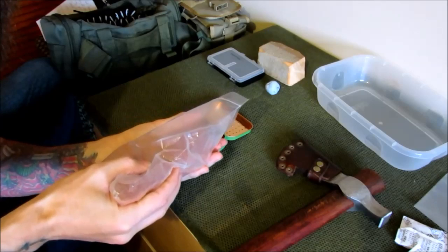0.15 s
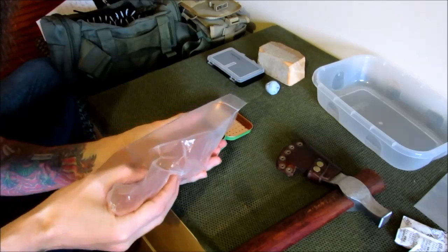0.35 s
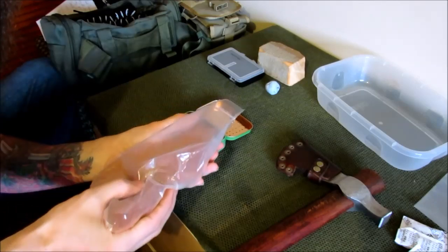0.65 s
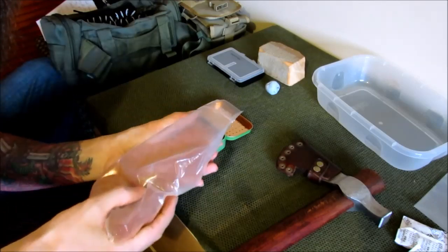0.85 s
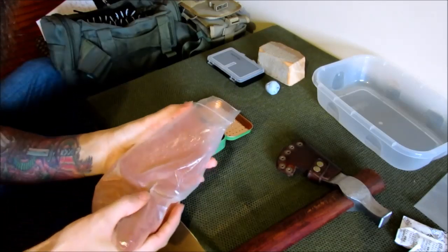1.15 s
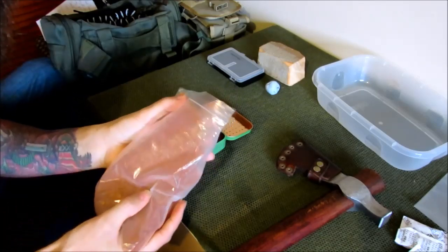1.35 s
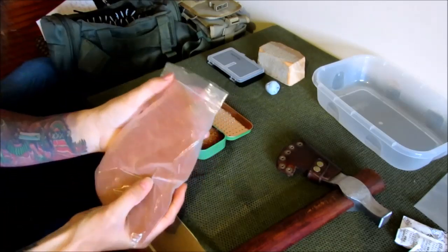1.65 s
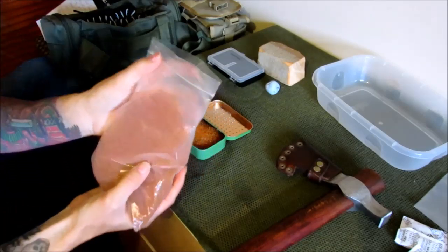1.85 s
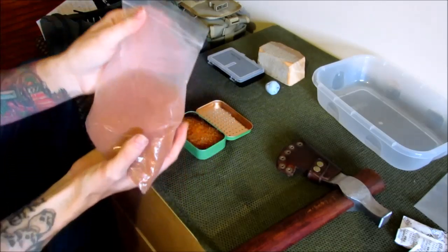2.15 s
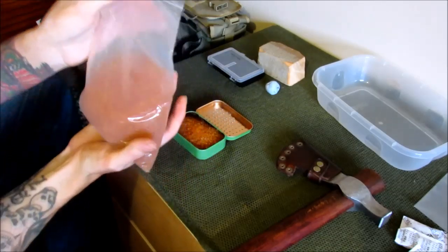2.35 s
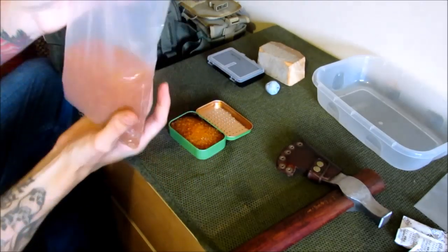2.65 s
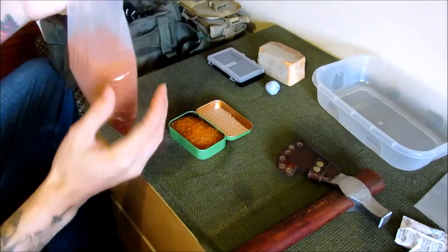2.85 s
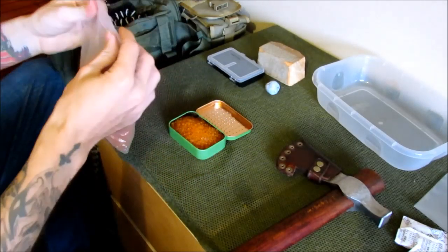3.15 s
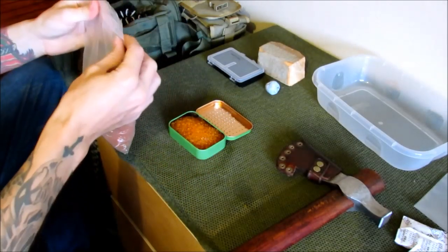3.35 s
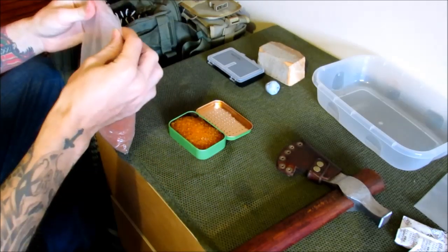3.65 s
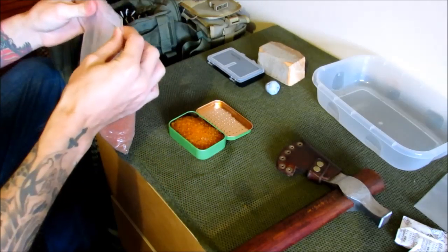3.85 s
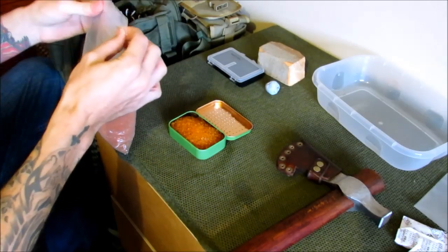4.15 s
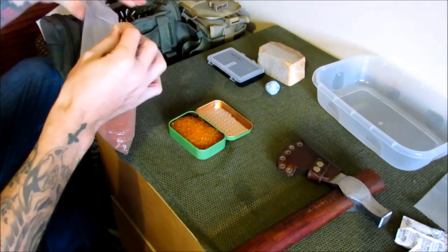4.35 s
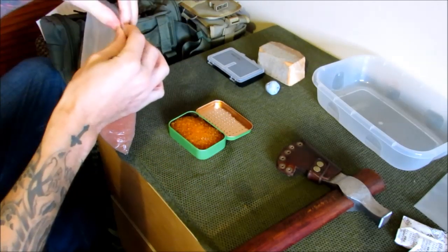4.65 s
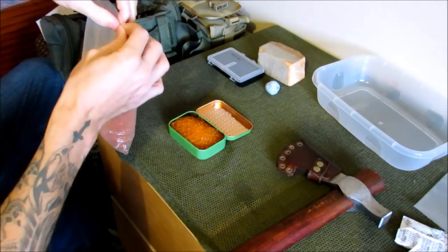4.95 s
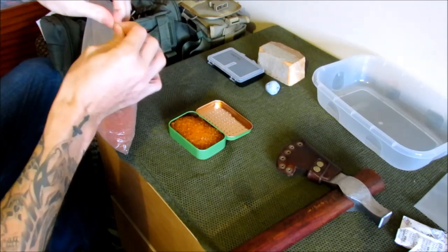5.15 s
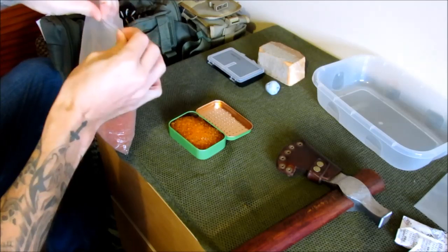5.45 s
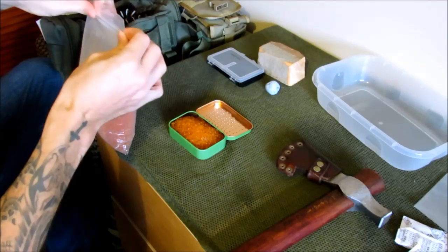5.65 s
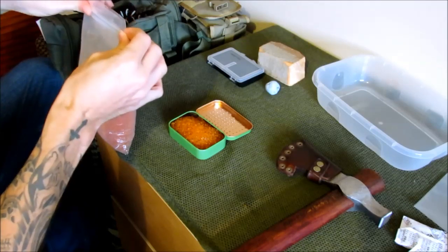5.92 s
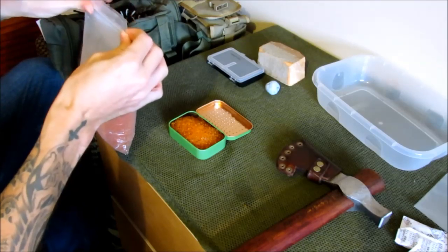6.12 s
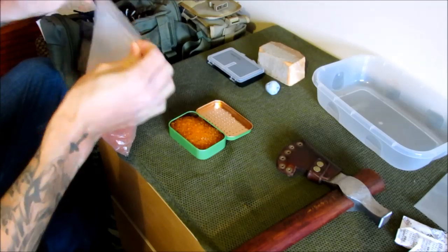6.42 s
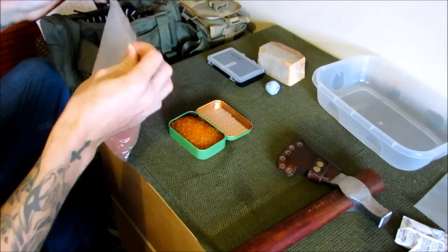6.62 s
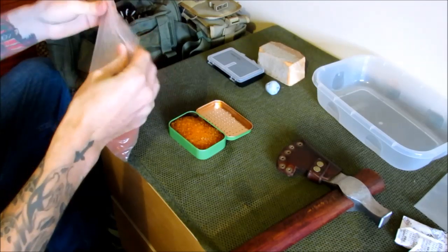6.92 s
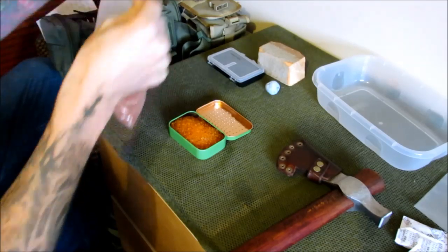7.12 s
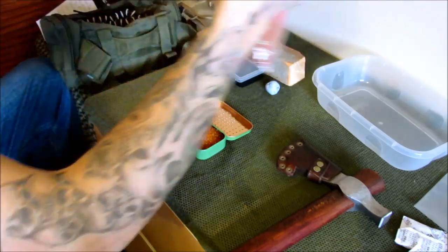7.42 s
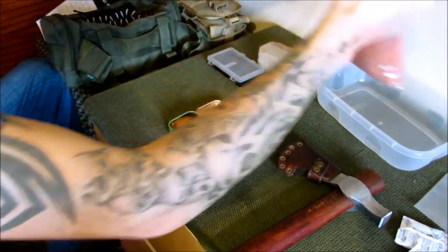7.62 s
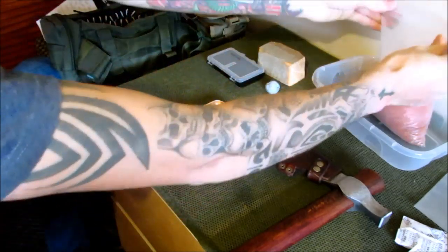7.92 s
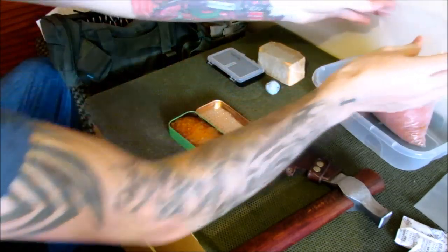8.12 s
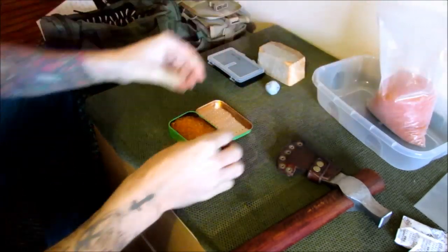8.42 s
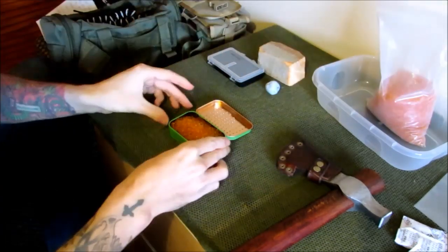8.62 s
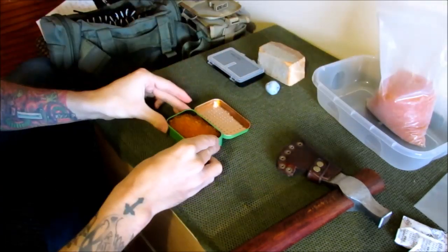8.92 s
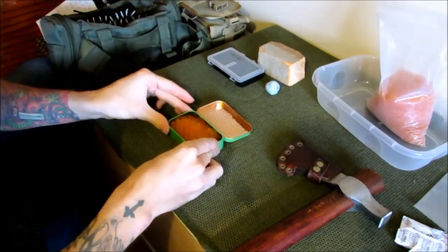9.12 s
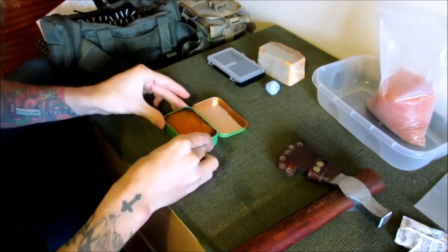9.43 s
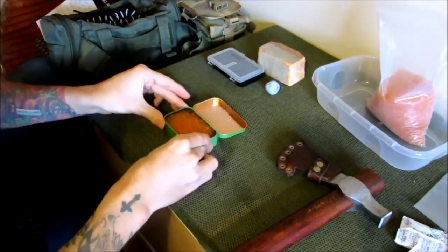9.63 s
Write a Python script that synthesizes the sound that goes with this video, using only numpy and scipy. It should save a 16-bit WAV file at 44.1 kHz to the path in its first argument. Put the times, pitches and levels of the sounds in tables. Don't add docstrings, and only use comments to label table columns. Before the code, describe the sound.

Close, dry stereo sound at a table indoors. Tiny hard beads hiss and rattle as they slide in a thin plastic bag, with sudden creases popping. Handling becomes uneven crinkles and faint pinching, then stronger snaps. After a short lull the bag is dropped in a tub with a hard crunchy hit. Finally light bright clicks of beads in a tin gather, with faint fingertip thumps.

```python
import sys
import numpy as np
from scipy import signal
from scipy.fft import rfft, irfft, next_fast_len
from scipy.io import wavfile
from scipy.ndimage import uniform_filter1d, minimum_filter1d, map_coordinates

SR = 44100
rng = np.random.default_rng(int(sys.argv[2]) if len(sys.argv) > 2 else 0)


def log_audio(samples):
    frames = np.atleast_2d(samples).T
    limited = np.clip(frames, -1, 1)
    pcm = np.round(limited * 32767).astype(np.int16)
    wavfile.write(sys.argv[1], SR, pcm)


def convert_level_to_amplitude(level_db):
    exponent = np.asarray(level_db, float) / 20
    return 10 ** exponent


N = 431279

# [t/s, left minus right/dB]
HANDS_SIDEWAYS = [
    (0, -2.5),
    (7.5, -3),
    (7.9, -8),
    (8.4, -2),
]
# [from t/s, to t/s]
HANDLED = (2.6, 8.17)

# [f/Hz, density/dB per Hz]
HUSH_SPECTRUM = [(20, -15), (60, -7), (200, -5.5), (500, -6), (1500, -13), (11700, -35), (16800, -29)]
HUSH_DB = -60

# [t/s, flow/dB, looseness/dB]; loose beads tick, packed ones bend the film
TIPPING = [(0, -42, -8.5), (.289, -41.5, -6.5), (.432, -44.5, -4), (.594, -50.5, -2), (.74, -54, -3.5),
           (.8, -53, 2), (.865, -55, -3.5), (.928, -50.5, 0), (1.12, -53, -3.5)]
# [t/s, flow/dB, looseness/dB]
POURING = [(1.429, -38.5, 1), (1.494, -40.5, -2.5), (1.75, -34.5, -2.5), (1.88, -33.5, 0),
           (1.95, -37.5, 0.5), (2.073, -40, 0), (2.23, -41, 1), (2.4, -35.5, -0.5), (2.45, -31.5, -0.5),
           (2.51, -34.5, -1), (2.542, -41.5, -1), (2.65, -46, 0.5), (2.74, -62, 0)]
# [t/s, flow/dB, looseness/dB]
LEVELLING = [(8.4, -77, -2), (8.95, -64, 4), (9.037, -61, 0), (9.079, -57, 7), (9.261, -52, 10.5),
             (9.47, -50, 10), (9.545, -51, 8.5), (9.56, -45.5, 8), (9.665, -47.5, 7.5), (9.685, -43, 8),
             (9.74, -44.5, 8.5), (9.778, -50, 10.5)]
# [peak t/s, level/dB, rise through 20 dB/s, fall through 20
# dB/s, looseness/dB]
FOLDING = [(1.76, -36, .04, 0.26, 2), (2.731, -32, 0.1, 0.13, -1), (2.8, -40, 0.44, 0.066, -8.5),
           (2.978, -40, 0.06, 0.096, -4.5), (3.085, -39, 0.074, 0.12, -7.5),
           (3.195, -36.5, 0.077, 0.091, -7), (3.23, -34, 0.086, 0.12, 0), (3.33, -38.5, 0.082, 0.11, -5.5),
           (3.42, -49, 0.12, 0.7, -3.5), (3.702, -47, 0.071, 0.12, -6.5), (3.991, -52.5, 0.13, 1, -8),
           (4.141, -45, 0.043, 0.15, -1.5), (4.238, -40, 0.018, .1, -10), (4.29, -32, 0.1, 0.11, -7),
           (4.41, -49, .015, 0.068, -3), (4.44, -51, 0.091, 0.028, -5), (4.6, -52, .2, .08, -3),
           (4.665, -47, 0.015, 0.088, -12.5), (4.79, -53.5, .1, 0.18, -11),
           (5.006, -45.5, 0.022, 0.063, -8), (5.08, -55.5, 0.089, 0.23, -11)]
# [peak t/s, level/dB, rise/s, fall/s, looseness/dB]
SEALING = [(5.168, -46.5, 0.015, 0.25, -13), (5.215, -42.5, 0.098, 0.24, -8.5), (5.355, -44, .02, .12, -4),
           (5.41, -44, .1, 0.068, -5), (5.55, -52, .05, .2, -3), (5.385, -42, 0.095, 0.18, -5),
           (5.623, -51.5, 0.52, 0.49, -5), (5.86, -53.5, 0.048, 0.04, -14), (5.994, -53, 0.26, 0.034, -5),
           (6.06, -51.5, 0.015, 0.11, -9), (6.119, -47, 0.03, 0.057, -8), (6.236, -47, 0.022, 0.11, -9.5),
           (6.311, -44, 0.014, 0.087, -4), (6.372, -36, 0.021, 0.12, -1.5), (6.406, -34, 0.03, 0.16, -4),
           (6.49, -40, 0.084, 0.36, -1.5), (6.682, -47.5, 0.63, 0.22, -11),
           (6.806, -30.5, 0.022, 0.11, -6.5), (6.97, -38, 0.13, 0.26, -9), (7.047, -31, 0.22, 0.073, -6)]
# [peak t/s, level/dB, rise/s, fall/s, looseness/dB]
DROPPING = [(7.33, -52, 0.082, 0.039, -1), (7.368, -50.5, .03, 0.051, -5.5), (7.51, -49.5, 0.18, 0.3, -12),
            (7.53, -35, .012, .06, -7), (7.56, -34, 0.038, 0.088, -7), (7.59, -39.5, .03, 0.11, -2),
            (7.69, -41, 0.27, 0.17, -7.5), (7.8, -45, 0.065, 0.42, -9.5), (7.886, -25, 0.011, 0.068, 4.5),
            (7.901, -23, 0.027, 0.11, -2), (8.02, -56, 0.12, 0.11, -4), (8.13, -43.5, 0.12, 0.077, -4.5),
            (8.41, -67, 0.03, .04, -16), (8.2, -61, .05, 1.24, -1), (8.65, -56.5, 0.008, 0.1, -5),
            (8.79, -55, 0.02, 0.14, -1), (8.9, -60.5, .12, .15, 2)]
HELD_DB, HELD_LOOSE_DB = -60.5, -13
# [t/s, level/dB]
FILM_SHARE = [(0, -34), (.6, -12.5), (1.3, -16), (1.8, -10), (2.3, -4.5), (2.9, -9), (7.2, -7.5),
              (8.2, -6.5), (9.7, -13.5)]
PACKED = 0.66
EVEN_POUR_DB = 3

# [t/s, mouth resonance/dB, heave of its weight/dB, deepest mode as it empties/dB]
BAG_HOLLOW = [(0, 6.5, -36, -14), (.6, 5.5, -45, -12), (1.15, 12, -55, 0), (1.55, 8, -42, 2.5),
              (2, 5.5, -30, 5), (2.3, 0.5, -21, 1), (2.9, -5, -10.5, -14), (7.2, -39, -14.5, 0),
              (7.8, -13, -31, -2)]
# [f/Hz, width/Hz, level/dB]
MOUTH_MODES = [(817, 72, -3.5), (1154, 62, -3), (1316, 113, 0.5), (1500, 72, -7)]
# [f/Hz, density/dB per Hz]
FLEX_SPECTRUM = [(100, -35), (250, -6), (550, 1.5), (1100, 1), (2000, 1), (4000, -30), (9000, -50)]
# [f/Hz, density/dB per Hz]
SLIDE_SPECTRUM = [(400, -29), (1200, -13), (2400, 1), (4000, -3), (6500, -6.5), (11000, -21.5),
                  (17000, -52)]
# [f/Hz, density/dB per Hz]
TICK_SPECTRUM = [(1500, -24), (4000, -1.5), (7000, -0.5), (10000, -3), (13000, -9), (16000, -13),
                 (20000, -51)]
# [f/Hz, density/dB per Hz]
HEAVE_SPECTRUM = [(40, -20.5), (200, 0.5), (400, -2), (900, -21)]

# [t/s, peak level/dB, f/Hz, rustle under the peak/dB]
POPS = [(.2992, -28, 2050, -17), (.4515, -27, 1500, -12), (1.0082, -31.5, 2270, -7),
        (1.2591, -28.5, 1540, -4), (1.9787, -10, 1250, -13.5), (2.1059, -20.5, 1100, -0.5),
        (2.1592, -17.5, 1150, -5), (2.3232, -23, 1730, -16), (2.4989, -16, 1950, -10),
        (2.6778, -21, 2040, -16), (2.7308, -22.5, 1900, -10), (3.0668, -26.5, 1760, -5),
        (3.2054, -21, 1490, -5), (3.4042, -29.5, 1410, -10), (3.477, -33, 2360, -8),
        (3.6461, -28, 2300, -27), (3.7017, -26.5, 2140, -14), (3.8337, -29.5, 1760, -18),
        (4.54, -43, 1290, 6.5), (4.9287, -35.5, 1280, -9), (5.6204, -26.5, 1900, -10),
        (5.6288, -29, 1400, -1.5), (6.416, -21, 1780, -3.5), (6.6393, -32, 2040, 1.5),
        (6.6844, -25.5, 2150, -5.5), (6.9049, -21, 1290, -20), (7.1262, -25.5, 1780, -9),
        (7.5634, -33, 1700, -5), (7.8853, -4, 2660, -27), (8.0903, -29.5, 1500, -14)]
# [t/s, snap level/dB, buckle level/dB, buckle f/Hz]
CREASES = [(0.6208, -15.5, -18, 1170), (.9399, -33, -26, 2040), (1.3343, -17, -44, 2330),
           (2.0628, -19, -37, 2190), (2.097, -14, -21, 1430), (2.122, -31, -18, 1770),
           (2.2581, -17, -15, 1590), (2.3822, -29, -21.5, 2220), (2.9034, -22, -23, 1590),
           (2.972, -15.5, -22.5, 1970), (3.2434, -14, -17.5, 2160), (3.8966, -38, -29.5, 1410),
           (4.1364, -36, -25, 2370), (4.232, -9.5, -18, 2780), (4.342, -31, -16, 1070),
           (5.358, -34, -27, 1560), (5.447, -28, -19.5, 1820), (5.7033, -35, -27, 2020),
           (6.2355, -35, -38, 1530), (6.3032, -27, -25.5, 2220), (6.379, -14, -19.5, 2100),
           (6.7993, -13, -20, 2040), (6.9969, -20, -12.5, 1990), (7.22, -31, -27.5, 1530),
           (7.5054, -45, -29, 1583), (7.5244, -16, -18, 2540), (7.792, -26, -22, 1670),
           (7.8954, -5, -9, 2470), (8.1129, -16.5, -22.5, 1580)]
# [t/s, peak level/dB, f/Hz]
SNAPS = [(.6264, -22, 7560), (2.1314, -15, 8100), (2.1379, -30, 7760), (2.1961, -23, 5760),
         (2.3564, -20, 6820), (2.4649, -28, 7810), (2.7592, -21, 6860), (2.9771, -20, 6400),
         (3.172, -21, 6000), (3.1902, -14, 5890), (3.2904, -25, 5400), (3.9521, -42, 7200),
         (3.9854, -32.5, 7760), (4.2385, -10.5, 4250), (4.2963, -27, 6660), (4.6575, -35, 5370),
         (4.708, -41, 3500), (5.0015, -33, 5900), (5.2715, -21.5, 6700), (5.7104, -34, 4300),
         (6.1197, -37, 5800), (6.3688, -14.5, 6600), (6.8894, -26, 8080), (6.9395, -16.5, 6660),
         (2.122, -6, 9800), (7.0437, -18, 7900), (7.5298, -17, 5100), (7.5564, -16.5, 7040),
         (7.904, -8, 6000), (7.879, -24, 8500), (4.4075, -33, 7500), (7.506, -34, 5470), (7.867, -29, 7700),
         (7.9902, -28, 4770),
         (0.1144, -36, 7380), (0.2882, -26, 7050), (0.3844, -32, 8040), (0.414, -28.5, 9280),
          (0.4394, -31, 8020), (0.5087, -41, 7460), (3.1712, -34, 8100), (5.0559, -45, 7560),
          (5.1796, -38, 7000), (6.2243, -37, 7390), (8.9044, -44, 7700), (8.9994, -45, 7340),
          (9.0533, -45, 8820)]
# [t/s, peak level/dB, f/Hz, rustle under the peak/dB]
FLICKS = [(0.7624, -43, 4680, -12), (0.7784, -39, 5260, -12), (0.9064, -33, 5540, -12),
          (1.1964, -30, 1500, -10), (2.9024, -23.5, 1540, -12), (3.2415, -16, 3920, -11),
          (3.3209, -23, 5450, -12), (3.934, -34, 5060, -12), (4.0397, -37, 1810, -12),
          (4.2822, -16, 1920, -7), (4.406, -34, 1860, -9), (4.6563, -34, 1580, -8),
          (5.0007, -33, 1810, -12), (5.0294, -39, 1700, -7), (5.1617, -35, 2010, -12),
          (5.2066, -30, 2000, -12), (5.3794, -31, 1910, -12), (5.8321, -44, 2730, -12),
          (5.8556, -37, 2310, -12), (5.9233, -34, 1840, -12), (6.0536, -40, 2470, -10),
          (6.101, -33, 1710, -6), (6.3026, -24, 6540, -14), (6.6383, -32, 2300, -12),
          (6.7446, -32, 2294, -12), (7.1137, -30, 2020, -12), (7.2185, -30, 2300, -12),
          (7.2974, -41, 2100, -12), (7.3278, -35, 1540, -5), (7.365, -30.5, 2720, -9),
          (7.4864, -33, 1580, -20), (7.5847, -28, 2490, -15), (7.67, -31, 2290, -12),
          (7.7662, -39, 2130, -12), (7.854, -30, 2060, -9), (8.082, -35, 1520, -12),
          (8.2794, -53, 1530, -12), (8.6474, -44, 2240, -10), (8.7744, -38, 5030, -12),
          (8.8079, -33, 5940, -12), (8.8894, -46, 1720, -12), (8.955, -34.5, 4350, -14)]
# [t/s, peak level/dB, f/Hz, rustle under the peak/dB]
RINGS = [(3.7, -37, 2920, -6), (4.626, -37, 2700, -4), (4.628, -41, 4400, -8), (4.706, -42, 3470, -10),
         (4.425, -39, 1900, -6), (2.384, -31, 2500, -8), (7.888, -17, 2500, -8), (7.893, -17, 2830, -8),
         (7.9, -18, 1870, -6), (7.905, -15, 4350, -6), (5.004, -44, 2100, -3), (3.647, -37, 2840, -8)]
# [t/s, peak level/dB]
BEADS_ON_TIN = [(8.648, -49), (8.785, -32), (8.81, -41), (8.9705, -32), (9.0704, -33), (9.086, -24),
                (9.1192, -30), (9.125, -27), (9.1777, -25), (9.2073, -23.5), (9.2507, -20.5), (9.2735, -29),
                (9.2806, -20.5), (9.4092, -21), (9.466, -23), (9.5136, -20.5), (9.5747, -20), (9.6115, -21),
                (9.6816, -23), (9.701, -16), (9.7587, -24)]
# [t/s, peak level/dB, f/Hz, rustle under the peak/dB]
KNOCKS = [(.645, -33, 1000, 0), (1.748, -25.5, 693, 4), (2.158, -19.5, 758, 0), (5.254, -33, 670, 14.5),
          (6.411, -27.5, 510, -16), (6.938, -25, 1800, 1), (8.56, -54.5, 184, -16), (8.908, -38, 576, 8),
          (8.912, -37, 1076, -4), (9.07, -51.5, 187, -12), (9.52, -46, 190, -4), (9.44, -52, 187, -6),
          (9.625, -40.5, 573, 10), (9.629, -35, 1050, 7), (9.67, -47, 187, -6), (9.745, -44, 185, -8)]
SNAP_RUSTLE_DB, BUCKLE_RUSTLE_DB, TIN_RUSTLE_DB = -19, -13, -17.5
CLEANER = 0.27
CREASE_HZ, TIN_HZ = 7700, 9800
PITCH_SCATTER = 0.04

# [f/Hz, t60/s]
ROOM_T60 = [(200, 0.093), (2500, 0.13), (15000, 0.086)]
# [f/Hz, level/dB]
MICROPHONE_TOP = [(15600, 1.5), (15900, -32), (16500, -36), (17000, -54)]
# [f/Hz, level/dB]
WIDEN = [(60, 7), (640, 4), (5000, 0.5), (15000, 5)]
PORT_LAG_S = 8e-6
DUCK_HZ, DUCK_FROM_DB, DUCK_SLOPE, LASTING_S = 110, -44, 0.9, 0.31


def unit(x):
    return x / np.sqrt(np.mean(x ** 2) + 1e-20)


def along(points, hz):
    f, value = np.transpose(points)
    return np.interp(np.log(hz + 1), np.log(f + 1), value)


def curves(rows):
    s, *columns = np.transpose(rows)
    return [np.interp(np.arange(N) / SR, s, column) for column in columns]


def wobble(rate):
    knots = rng.standard_normal(int(N * rate / SR) + 4)
    return map_coordinates(knots, [np.arange(N) * rate / SR])


def filtered(x, response):
    m = next_fast_len(N + SR // 2)
    return irfft(rfft(x, m) * response(np.fft.rfftfreq(m, 1 / SR)), m)[..., :N]


def peak(f, hz, width):
    return 1j * f * width / (hz * hz - f * f + 1j * f * width)


def while_handled(t):
    return (t > HANDLED[0]) & (t < HANDLED[1])


def hush():
    noise = filtered(rng.standard_normal((2, N)), lambda hz: convert_level_to_amplitude(along(HUSH_SPECTRUM, hz)))
    return convert_level_to_amplitude(HUSH_DB + 0.21 * wobble(3.7)) * unit(noise)


def motion():
    t = np.arange(0, N / SR, 1 / 1000)
    s, flow_db, flow_loose_db = np.transpose(TIPPING + POURING + LEVELLING)
    at, peak_db, rise, fall, move_loose_db = np.transpose(FOLDING + SEALING + DROPPING)[..., None]
    moves_db = peak_db - 20 * np.where(t < at, (at - t) / rise, (t - at) / fall)
    held_db = np.where(while_handled(t), HELD_DB, -120)
    level = np.vstack([np.interp(t, s, flow_db), held_db, moves_db])
    flow_loose = np.interp(t, s, flow_loose_db)
    loose = np.vstack([flow_loose, HELD_LOOSE_DB + 0 * t, move_loose_db + 0 * t])

    def total(db):
        return 10 * np.log10(np.sum(convert_level_to_amplitude(db) ** 2, axis=0))

    flex_db = total(level - PACKED * loose) + np.interp(t, *np.transpose(FILM_SHARE))
    return curves(np.transpose([t, flex_db, total(level), total(level + loose)]))


def rattle(spectrum, rate, spread_db, life, clump_db, blur_db, wide_db):
    when, size = rng.random(N), rng.exponential(size=N)
    knocks = (when < rate / SR) * convert_level_to_amplitude(spread_db * np.minimum(size, 3))
    bursts = signal.lfilter([1], [1, -convert_level_to_amplitude(-60 / (life * SR))], knocks)
    blurred = np.hypot(unit(bursts), convert_level_to_amplitude(blur_db)) / np.hypot(1, convert_level_to_amplitude(blur_db))
    push = blurred * convert_level_to_amplitude(clump_db * wobble(35))
    shared, apart = rng.standard_normal((2, N))
    pair = shared + convert_level_to_amplitude(wide_db) * np.array([apart, -apart])
    return unit(filtered(push * pair, lambda hz: convert_level_to_amplitude(along(spectrum, hz))))


def beads():
    flex_db, slide_db, tick_db = motion()
    mouth_db, heave_db, deep_db = curves(BAG_HOLLOW)
    even_db = EVEN_POUR_DB * (np.arange(N) < HANDLED[0] * SR)
    flex = convert_level_to_amplitude(flex_db - 1.5) * rattle(FLEX_SPECTRUM, rate=300, spread_db=2.5, life=0.012,
                                       clump_db=0.8, blur_db=4 + even_db, wide_db=-12)
    slide = convert_level_to_amplitude(slide_db - 2.42) * rattle(SLIDE_SPECTRUM, rate=760, spread_db=2.0, life=0.0058,
                                          clump_db=1.47, blur_db=0.6 + even_db, wide_db=-5.5)
    tick = convert_level_to_amplitude(tick_db + 0.6) * rattle(TICK_SPECTRUM, rate=900, spread_db=3.5, life=0.002,
                                       clump_db=1.2, blur_db=1.5 + even_db, wide_db=-6)
    heave = convert_level_to_amplitude(flex_db + heave_db) * rattle(HEAVE_SPECTRUM, rate=100, spread_db=-1.0, life=0.044,
                                             clump_db=-0.9, blur_db=8.5, wide_db=-36)

    def mouth(f):
        deepest, *others = [convert_level_to_amplitude(db) * peak(f, hz, width) for hz, width, db in MOUTH_MODES]
        return np.array([deepest, sum(others)])

    deep, upper = filtered((flex + slide).mean(axis=0), mouth)
    ring = convert_level_to_amplitude(deep_db) * deep + upper
    return flex + slide + tick + heave + convert_level_to_amplitude(mouth_db + 2.0) * ring


def cracks(rows, turns, edge_db, width, lift_db, t60, tear):
    out = np.zeros(N + SR)
    t = np.arange(next_fast_len(SR // 8)) / SR
    f = np.fft.rfftfreq(len(t), 1 / SR)
    noise = rng.standard_normal((len(rows), len(t)))
    for (s, db, hz, rustle_db), grit in zip(rows, noise):
        ring = np.sin(2 * np.pi * hz * t) * convert_level_to_amplitude(-60 * t * hz / turns)
        fade = convert_level_to_amplitude(edge_db - 60 * t / tear) + convert_level_to_amplitude(rustle_db - 60 * t / t60)
        colour = peak(f, hz, width * hz) * peak(f, hz, 4 * hz)
        crack = irfft(rfft(ring + fade * grit) * colour, len(t))
        out[round(s * SR):][:len(t)] += convert_level_to_amplitude(db + lift_db) * crack
    return out[:N]


def scattered(hz, count):
    return hz * np.exp(PITCH_SCATTER * rng.standard_normal(count))


def film():
    crease_hz = scattered(CREASE_HZ, len(CREASES))
    folds = SNAPS + [(s, db, hz) for (s, db, _, _), hz in zip(CREASES, crease_hz)]
    sharp = [(s, db, hz, SNAP_RUSTLE_DB - CLEANER * (db + 19)) for s, db, hz in folds]
    tin_hz = scattered(TIN_HZ, len(BEADS_ON_TIN))
    sharp += [(s, db, hz, TIN_RUSTLE_DB) for (s, db), hz in zip(BEADS_ON_TIN, tin_hz)]
    dull = POPS + [(s, db, hz, BUCKLE_RUSTLE_DB) for s, _, db, hz in CREASES]
    snaps = cracks(sharp, turns=5.3, edge_db=-10, width=0.65, lift_db=6.5, t60=0.036, tear=0.0032)
    flicks = cracks(FLICKS, turns=8.6, edge_db=-2.5, width=0.52, lift_db=-3.0, t60=0.078, tear=0.017)
    rings = cracks(RINGS, turns=64, edge_db=-8, width=0.2, lift_db=1.0, t60=0.12, tear=0.03)
    buckles = cracks(dull, turns=4.2, edge_db=-5.5, width=0.96, lift_db=-0.96, t60=0.14, tear=0.033)
    return snaps + flicks + rings + buckles


def fingertips():
    return cracks(KNOCKS, turns=32, edge_db=-11, width=0.94, lift_db=-6.5, t60=0.17, tear=0.049)


def room(x):
    hop = SR // 8
    starts = np.arange(0, N, hop)
    padded = np.pad(x, (hop, 2 * hop))
    pieces = np.lib.stride_tricks.sliding_window_view(padded, 2 * hop)[starts]
    window = np.sin(np.pi * np.arange(2 * hop) / (2 * hop))
    hz, t, z = signal.stft(rng.standard_normal((2, len(starts), SR // 6)), SR, nperseg=256)
    decay = convert_level_to_amplitude(-60 * t / along(ROOM_T60, hz)[:, None])
    tails = signal.istft(z * decay, SR, nperseg=256)[1]
    tails = tails / np.linalg.norm(tails, axis=-1, keepdims=True)
    wet = signal.fftconvolve(pieces[None] * window, tails, axes=-1)
    out = np.zeros((2, N + SR))
    for s, piece in zip(starts, wet.swapaxes(0, 1)):
        out[:, s + 60:][:, :piece.shape[1]] += piece
    return out[:, hop:N + hop]


def scene():
    handled = while_handled(np.arange(N) / SR)
    uneven = convert_level_to_amplitude(1.44 * handled * wobble(16))
    near = convert_level_to_amplitude(-0.5) * uneven * beads() + film() + fingertips()
    sideways_db = curves(HANDS_SIDEWAYS)[0]
    placed = near * convert_level_to_amplitude(sideways_db * [[0.3], [-0.3]])
    echoes = convert_level_to_amplitude(-8) * room(near.mean(axis=0)) * convert_level_to_amplitude([[0.6], [-0.6]])
    return placed + echoes + hush()


def thinned(x):
    level_db = 10 * np.log10(np.abs(uniform_filter1d(x ** 2, SR // 20)) + 1e-12)
    lasting_db = uniform_filter1d(minimum_filter1d(level_db, int(LASTING_S * SR)), SR // 10)
    cut_db = DUCK_SLOPE * np.maximum(lasting_db - DUCK_FROM_DB, 0)
    bass = filtered(x, lambda hz: 1 / (1 + (hz / DUCK_HZ) ** 4))
    return x - bass * (1 - convert_level_to_amplitude(-cut_db))


def band_limit(x):
    return signal.sosfilt(signal.butter(12, 16970, fs=SR, output="sos"), x)


def record(dry):
    lead = PORT_LAG_S * np.array([[1], [-1]])
    ports = filtered(dry, lambda hz: convert_level_to_amplitude(along(MICROPHONE_TOP, hz)) * np.exp(1j * np.pi * hz * lead))
    mid = thinned(ports.mean(axis=0))
    side = filtered((ports[0] - ports[1]) / 2, lambda hz: convert_level_to_amplitude(along(WIDEN, hz)))
    wide = np.array([mid + side, mid - side])
    rounded = wide / (1 + (wide / 0.9) ** 4) ** (1 / 4)
    return band_limit(rounded)


dry = scene()
out = record(dry)
log_audio(out)
```